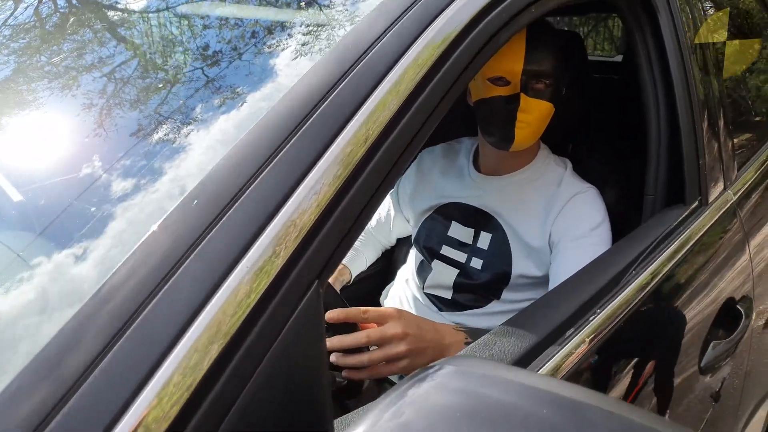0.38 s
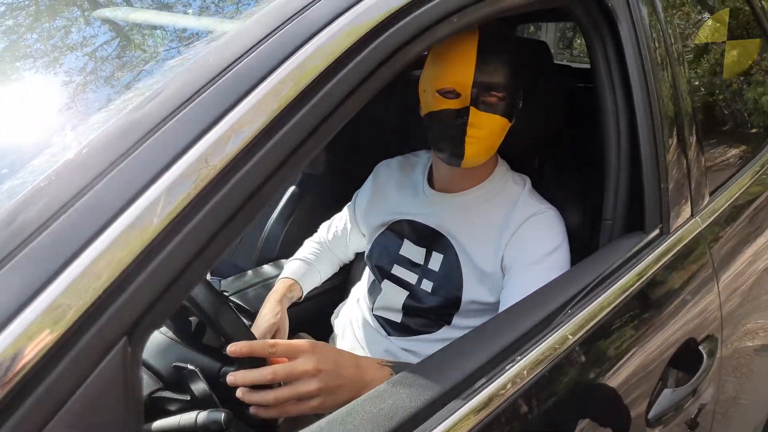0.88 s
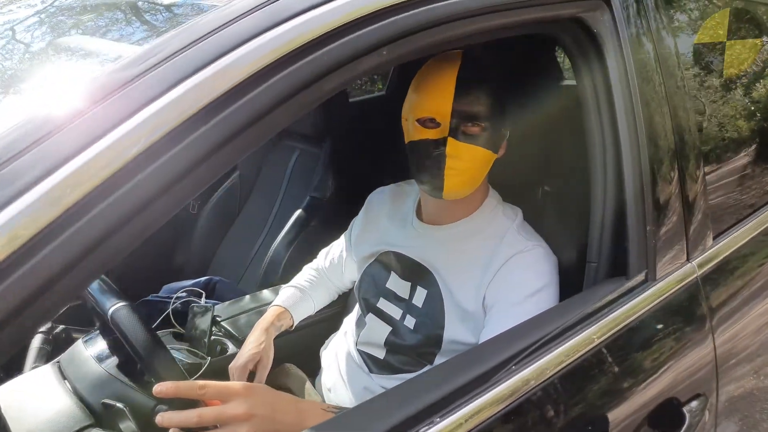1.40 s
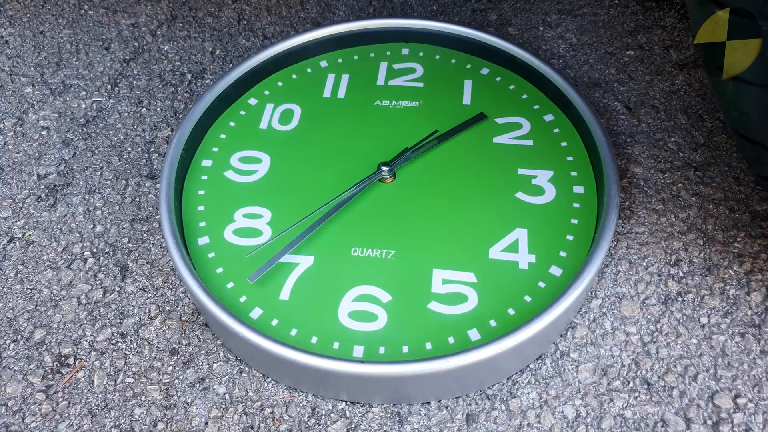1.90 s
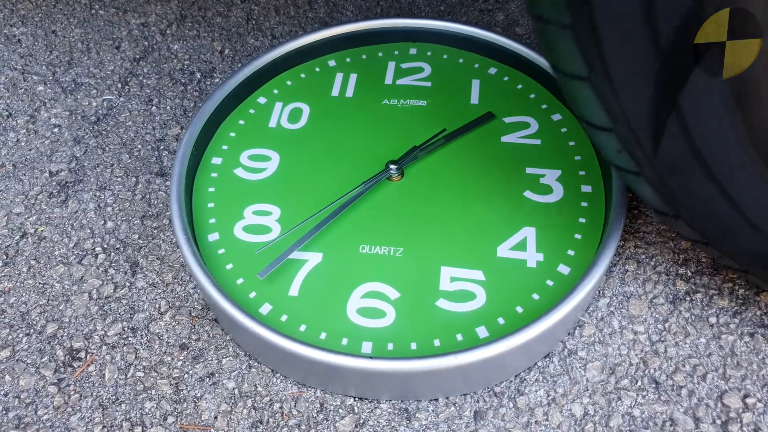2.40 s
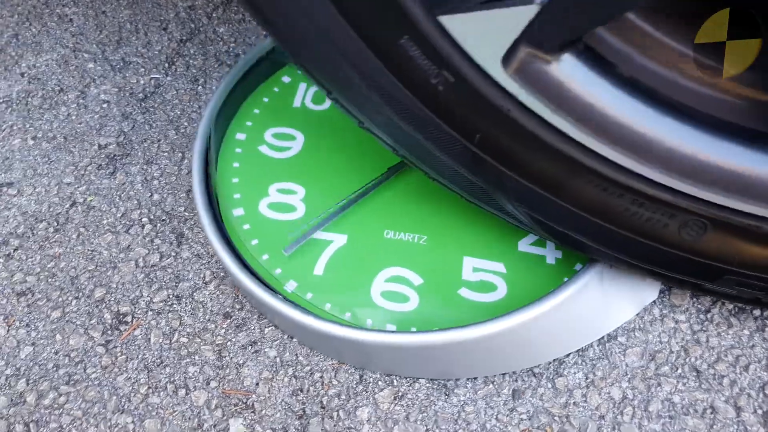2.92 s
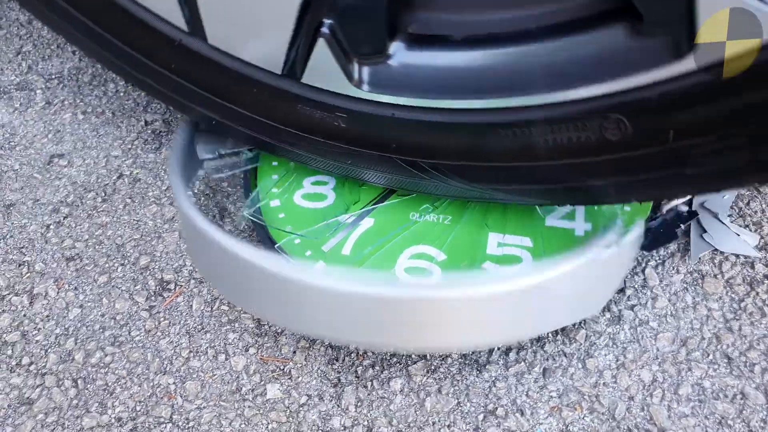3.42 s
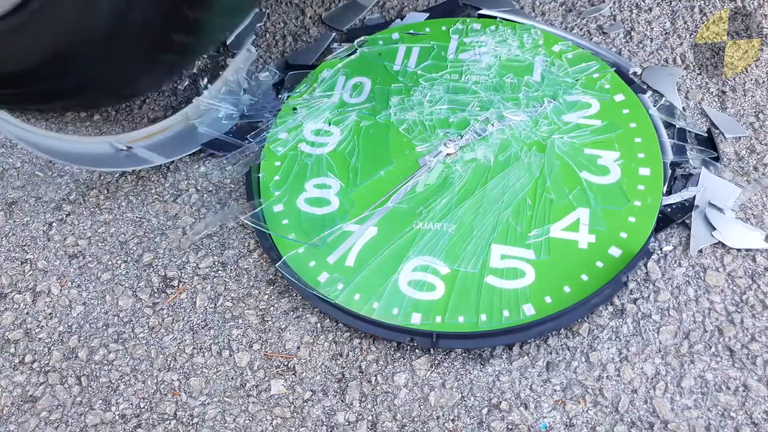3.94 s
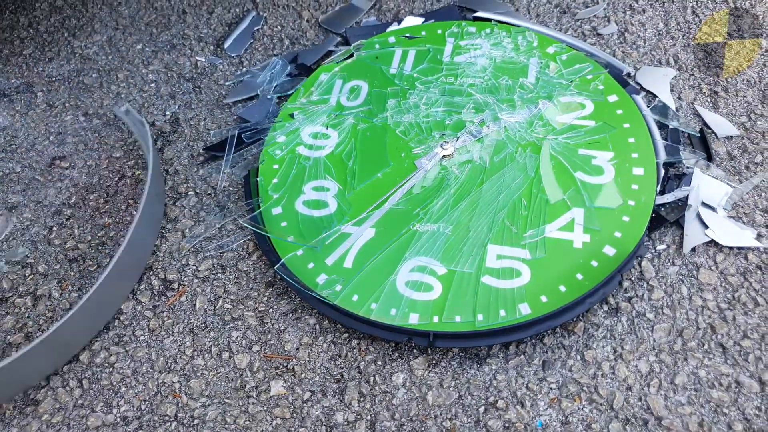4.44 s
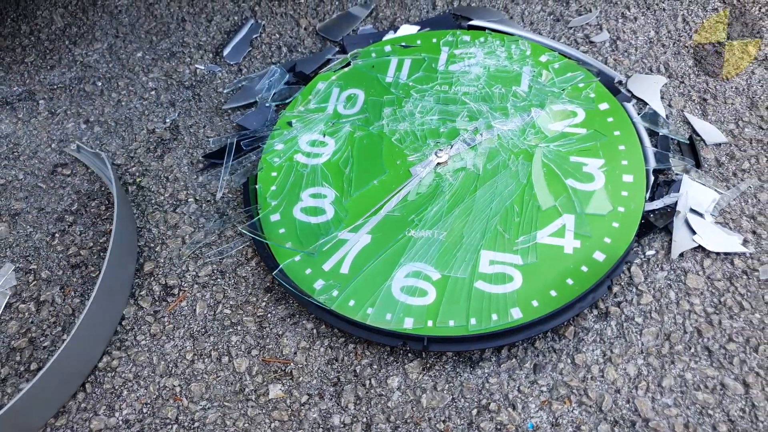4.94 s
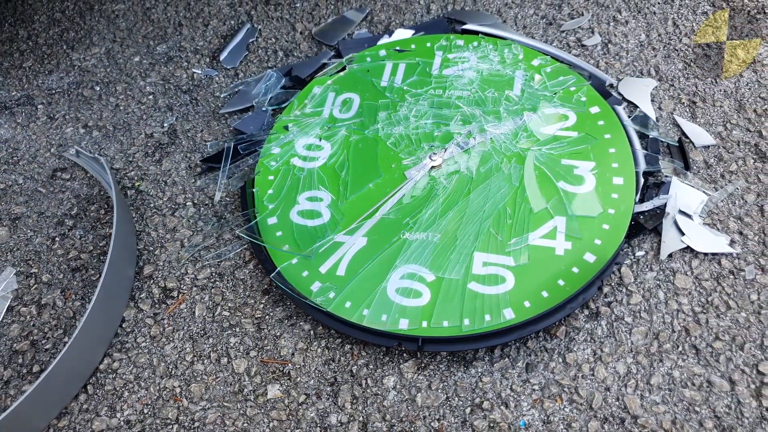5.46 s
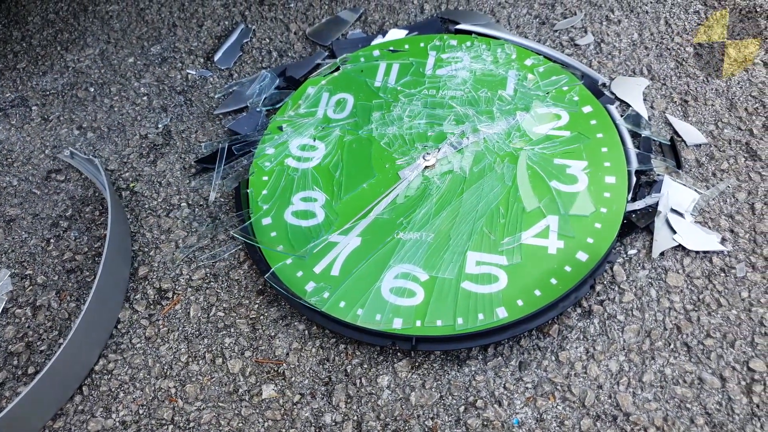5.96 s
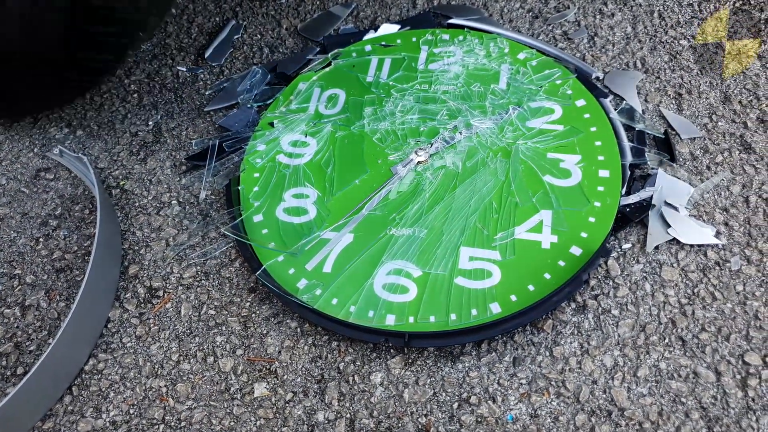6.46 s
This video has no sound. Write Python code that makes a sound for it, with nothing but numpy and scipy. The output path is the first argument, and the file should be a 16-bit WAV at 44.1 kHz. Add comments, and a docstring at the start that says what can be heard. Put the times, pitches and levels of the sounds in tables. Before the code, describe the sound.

Low idling engine hum, a near-silent pause, then a second of loud splintering under a tyre, small settling clicks, and the engine faintly revving back.

```python
"""A tyre climbs a wall clock and cracks its plastic case and glass: noise bursts over a grinding bed.
Fragments chip, shards ring on single notes and a piece of the rim rings as it rocks to rest.
Before this a car idles close by, built from shaft-order tones and pulsing noise; at 1.82 s the listening
point jumps to the asphalt by the clock. At the end the engine comes back louder as the car reverses."""
import sys
import numpy as np
from scipy import signal
from scipy.fft import rfft, irfft, next_fast_len
from scipy.io import wavfile
from scipy.ndimage import uniform_filter1d, map_coordinates

SR = 44100
rng = np.random.default_rng(int(sys.argv[2]) if len(sys.argv) > 2 else 0)


def pcm_store(signal):
    """Save signal as 16-bit PCM."""
    levels = np.round(np.clip(np.atleast_2d(signal), -1, 1) * 32767)
    wavfile.write(sys.argv[1], SR, levels.astype(np.int16).T)


def to_linear_factor(level_db):
    """Convert decibel levels (scalar or array-like) to linear amplitude factors."""
    exponent = np.asarray(level_db, float) / 20
    return 10 ** exponent


N = 290619
TIME = np.arange(N) / SR
CUT_S = 1.82  # jump from beside the car to the ground
BESIDE = TIME < CUT_S
TYRE_OFF_S, RIM_FREE_S = 3.6, 4.385


def unit(x):
    """Scaled to rms 1."""
    return x / np.sqrt(np.mean(x ** 2) + 1e-20)


def along(points, hz):
    """Reads (pitch_hz, value) points on a log frequency axis."""
    f, v = np.transpose(points)
    return np.interp(np.log(hz + 1), np.log(f + 1), v)


def curves(rows):
    """One value per sample for each column after start_s."""
    s, *cols = np.transpose(rows)
    return np.array([np.interp(TIME, s, c) for c in cols])


def wobble(rate):
    """A smooth random curve, rate knots a second."""
    return map_coordinates(rng.standard_normal(int(N * rate / SR) + 4), [TIME * rate])


def filtered(x, response):
    """x shaped by a complex response of frequency."""
    m = next_fast_len(N + 8192)
    return irfft(rfft(x, m) * response(np.fft.rfftfreq(m, 1 / SR)), m)[..., :N]


def rush(spectrum, alike, patchy_db, spiky_db=0.):
    """Coloured stereo noise, its mid at rms 1, with random patches and short random swells."""
    pair = rng.standard_normal((2, N)) * to_linear_factor(spiky_db * wobble(900))
    z = signal.stft(pair, nperseg=256)[2]
    field = rng.standard_normal(z.shape[1:])
    field = uniform_filter1d(uniform_filter1d(field, size=2, axis=0), size=4, axis=1)
    pair = signal.istft(z * to_linear_factor(patchy_db * unit(field)), nperseg=256)[1][:, :N]

    def mid_side(hz):
        # the angle between mid and side sets the left-right likeness
        angle = np.arccos(np.clip(along(alike, hz), -1, 1)) / 2
        return to_linear_factor(along(spectrum, hz)) * [np.cos(angle), np.sin(angle)]

    mid, side = filtered(pair, mid_side)
    return np.array([mid + side, mid - side]) / np.sqrt(np.mean(mid ** 2))


# colours of big, middling and small fragments, and of the tyre's thud: pitch_hz, level_db
KNOCK_COLOUR = [(94, -37.5), (160, -6.5), (303, -7.5), (365, -2.5), (560, -5), (1120, -1.5), (1300, -5.5),
                (1690, -32), (2860, -120)]
CRACK_COLOUR = [(590, -33.5), (1000, -16.5), (1130, -3.5), (1380, -3), (1560, 0), (2040, 1.5), (2450, -3),
                (3130, 1), (3410, -1), (4280, -0.5), (5460, -1.5), (7140, -15.5), (8000, -30), (10400, -42),
                (17600, -120)]
SPLINTER_COLOUR = [(4410, -39), (7500, -7), (11800, 3.5), (14900, -2.5), (16000, -10), (16300, -26.5),
                   (16500, -32)]
THUD_COLOUR = [(20, -28), (75, 4.5), (200, -12), (400, -120)]
# width of the clock's sound: pitch_hz, left-right likeness (-1 to 1)
CLOCK_WIDTH = [(60, 0.84), (150, 0.53), (380, 0.94), (950, 0.61), (2380, 0.031), (5980, 0.53),
               (15000, 0.02)]


def crush():
    """Snaps over a grinding bed: each fracture is a grainy burst in three ranges of fragment size."""
    lurch, bed = grinding()
    blows = bursts()
    level = np.sqrt(bed ** 2 + blows)
    knock = level[0] * rush(KNOCK_COLOUR, CLOCK_WIDTH, patchy_db=4.5, spiky_db=3.5)
    crack = level[1] * rush(CRACK_COLOUR, CLOCK_WIDTH, patchy_db=2.5, spiky_db=2.0)
    splinter = level[2] * rush(SPLINTER_COLOUR, CLOCK_WIDTH, patchy_db=1.5, spiky_db=3.0)
    # crack and splinter lean to the right
    crack = crack * to_linear_factor([[-2.5], [2.5]])
    splinter = splinter * to_linear_factor([[-3.5], [3.5]])
    sharpness = .5 + blows[1] / (level[1] ** 2 + 1e-20)  # fractures drive the rim harder than grinding
    rim = rim_piece((crack + knock) * sharpness)
    thud = lurch * rush(THUD_COLOUR, CLOCK_WIDTH, patchy_db=0.0)
    fragments = to_linear_factor(-7.5) * chips(level[1], count=1100, life_ms=9.6)
    return thud + knock + crack + splinter + rim + fragments


# bulk_db: big pieces knock, small ones splinter
# snaps under the tyre: start_s, level_db, length_ms, bulk_db
SNAPS = [(2.6517, -14, 9.1, 11), (2.7223, -16.5, 8.6, -6.5), (2.735, -17.5, 9.7, -1.5),
         (2.7532, -18.5, 11, -7), (2.7834, -24.5, 3, 0.5), (2.7942, -15, 12, -1.5), (2.806, -19.5, 8.4, 1),
         (2.8164, -16.5, 14, 5.5), (2.8464, -23.5, 5.9, -1.5), (2.8749, -25.5, 12, -0.5),
         (2.884, -6.5, 2.4, 2), (2.9114, -15, 9.2, 6.5), (2.9256, -18, 5.5, 6), (2.9658, -10.5, 3.7, 1),
         (2.975, -13, 7.9, 2), (3.0001, -14.5, 5, -3), (3.0145, -24.5, 8.3, 2), (3.0272, -21.5, 9.6, 2),
         (3.039, -24, 4.7, -1), (3.0458, -19, 11.6, 5.5), (3.0696, -26, 10.8, 1.5), (3.107, -21, 9.7, -4),
         (3.116, -22, 14, -3.5), (3.1403, -14, 8, 2), (3.1789, -11.5, 3.1, 4), (3.192, -15, 10, 4.5),
         (3.2173, -18, 8.7, -3.5), (3.2312, -15, 7.5, 1), (3.257, -15, 3.1, 0), (3.265, -19, 5.5, -0.5),
         (3.2909, -15.5, 8.5, -1.5), (3.3014, -13.5, 9, 1), (3.321, -20, 9.1, -1), (3.3393, -20.5, 4.2, -4),
         (3.366, -16, 8.2, 1), (3.376, -17, 10.6, 2.5), (3.4069, -19, 8.8, -1), (3.4272, -17, 10.7, 0.5),
         (3.4433, -15, 3.4, -1), (3.4492, -21, 8.3, 3), (3.4763, -17.5, 14.4, -2.5), (3.4969, -16, 5, 6.5),
         (3.508, -16.5, 6.8, 0), (3.5436, -15.5, 5.2, -2), (3.579, -23.5, 3, 3.5), (3.62, -23.5, 4.6, -3.5),
         (3.6396, -28, 12.4, 8), (3.656, -39, 5.3, -5)]
# the case creaking under the first load, then pieces settling: start_s, level_db, length_ms, bulk_db
SETTLING = [(2.294, -72, 6.8, -26), (2.335, -74, 60, -14), (2.403, -68, 18, 14), (2.4454, -63, 4.8, 3),
            (2.486, -60.5, 4.3, 5), (2.533, -63, 8, 19), (2.5513, -69, 7.5, 12), (3.7017, -46.5, 7.2, 4),
            (3.732, -48.5, 13, -6), (3.7915, -51.5, 6.2, -25), (3.826, -48.5, 14, -13),
            (3.846, -64, 5.3, -8), (3.888, -49, 9, -7), (3.9057, -46.5, 4, -8), (4.0228, -69.5, 11.8, -13),
            (4.06, -60.5, 7.6, -1), (4.1266, -57, 8.3, 5.5), (4.1418, -60.5, 25, 4),
            (4.1574, -57.5, 8.1, 8), (4.1696, -47, 4.2, -4), (4.1794, -54, 6.2, -4), (4.2047, -49, 3, -11),
            (4.2732, -60, 3.9, -6), (4.3002, -56, 5.8, -5), (4.34, -63, 9.1, -23), (4.3684, -53, 3.7, 4),
            (4.376, -50.5, 10, 5), (4.3897, -57, 19, 6), (4.4154, -51.5, 6.5, -10), (4.498, -55, 5.9, 3),
            (4.514, -60.5, 7.5, 11), (4.5246, -58.5, 4.5, 8), (4.543, -63, 8.2, 8),
            (4.558, -55.5, 6.8, -22), (4.618, -53, 3, 0), (4.6296, -52.5, 10, 6), (4.691, -59.5, 12, 0),
            (4.7262, -56.5, 4.9, 8.5), (4.7427, -58, 2.4, 7), (4.806, -67.5, 2.4, 3)]
# grit popping under the tyres: start_s, level_db, length_ms, bulk_db
PEBBLES = [(.646, -53.5, 8.6, -1), (.668, -51.5, 7.9, -4), (.69, -51, 6.3, -6), (.743, -52, 5.8, -4),
           (1.378, -49.5, 16, 16), (1.435, -40, 7, 6), (1.447, -48, 36, 4), (1.622, -48.5, 2.7, -13),
           (1.668, -54, 4.9, 2)]


def bursts():
    """Power envelopes of knock, crack and splinter: a quick rise, a hold, a fast fade, a faint tail."""
    power, t_ms = np.zeros((3, N + SR)), np.arange(SR // 8) / SR * 1000
    rise = np.clip(t_ms / 1.2, 0, 1) ** 2
    tail = to_linear_factor(-29.5 - 1.3 * t_ms)
    for s, db, ms, bulk_db in np.vstack([PEBBLES, SNAPS, SETTLING]):
        # (level_db re the fracture, stretch of the fade) for knock, crack, splinter
        ranges = [(-12.5 + bulk_db, 1.4), (-1.2, 1.05), (-9 - 0.44 * bulk_db, .9)]
        for band, (level_db, linger) in enumerate(ranges):
            fade = to_linear_factor(-np.clip(t_ms - 0.37 * ms, 0, None) * 26 / (linger * ms))
            burst = rise * (fade + tail) * to_linear_factor(2 * (db + level_db))
            power[band, round(s * SR):][:len(t_ms)] += burst
    return power[:, :N]


# the tyre lurching over the case: start_s, level_db
LURCHES = [(2.67, -35), (2.84, -37), (2.98, -39), (3.17, -41), (3.31, -40.5), (3.39, -40.5), (3.51, -39),
           (3.65, -50.5)]
# steady grinding and skidding of fragments: start_s, level_db
GRIND = [(2.65, -26.5), (3.2, -28), (3.56, -30.5), (3.64, -33), (3.7, -51), (3.81, -64), (4.19, -65),
         (4.24, -77), (4.33, -73), (4.4, -71), (4.53, -67), (4.78, -72.5), (4.85, -105)]
# the grinding lets up for a moment before something gives: start_s (deepest point), depth_db
LULLS = [(2.712, 2.5), (2.77, 10), (2.87, 11), (2.954, 10.5), (2.995, 4.5), (3.021, 5), (3.135, 3.5),
         (3.172, 2.5), (3.25, 3.5), (3.28, 5), (3.355, 1.5), (3.4, 3), (3.465, 7), (3.535, 3), (3.6, 8.5),
         (3.632, 3.5), (3.815, 3), (3.87, 0.5), (4.049, 5), (4.479, 24), (4.605, 1), (4.675, 1)]


def grinding():
    """Gains of the tyre's lurch and of the knock, crack and splinter beds of crushed plastic and glass."""
    rise_db_per_s, fall_db_per_s, lull_s = 200, 130.5, .012
    case_db, flatten_db_per_s, scrape_db = 8, 9.5, -15  # case re lurch, low scrape re grinding
    gate = np.clip((TIME - 2.652) / .004, 0, 1) * (TIME < 4.85)
    lurch = gate * np.max([
        to_linear_factor(db - np.maximum(rise_db_per_s * (s - TIME), fall_db_per_s * (TIME - s)))
        for s, db in LURCHES], axis=0)
    lull_db = sum(db * np.exp(-.5 * ((TIME - s) / lull_s) ** 2) for s, db in LULLS)
    grind = gate * to_linear_factor(curves(GRIND)[0] - lull_db)
    # the hollow case booms with each lurch, less as it flattens
    case = lurch * to_linear_factor(case_db - flatten_db_per_s * (TIME - LURCHES[0][0]))
    low = np.hypot(case, to_linear_factor(scrape_db) * grind)
    # splinters re grinding: under the tyre, flying shards, loose rim
    glass_db = np.select([TIME < TYRE_OFF_S, TIME < RIM_FREE_S], (-8, -4), -20)
    flutter_db = np.where(TIME < TYRE_OFF_S, 2, 3) * wobble(70)
    return lurch, to_linear_factor(flutter_db) * np.array([low, grind, to_linear_factor(glass_db) * grind])


# modes of the loose rim piece: pitch_hz, width_hz, level_db
RIM_MODES = [(1569, 28, 12), (2480, 136, 7), (3265, 55, -2), (4560, 160, -17), (4930, 45, -6)]


def rim_piece(contact):
    """Once free, the rim's curved shell rings in narrow resonances driven by every contact."""
    def shell(f):
        return sum((-1) ** k * to_linear_factor(db) * 1j * f * w / (c * c - f * f + 1j * f * w)
                   for k, (c, w, db) in enumerate(RIM_MODES))

    return to_linear_factor(6.5) * filtered(contact * (TIME > RIM_FREE_S), shell)


# strength of a fragment by its note: pitch_hz, level_db
CHIP_STRENGTH = [(1000, -9), (1800, -1.5), (5200, 3.5), (7500, -10.5), (11500, -3), (14500, -12.5)]


def chips(level, count, life_ms):
    """Small fragments, each struck as hard as the crushing at that moment and ringing on its own note."""
    when, pitch, size, pan = rng.random((count, 4)).T
    at = ((2.9 + 2.1 * when) * SR).astype(int)
    hz, t = 1000 * 14.5 ** pitch, np.arange(SR // 30) / SR
    gain = level[at] * to_linear_factor(along(CHIP_STRENGTH, hz)) * np.minimum(-np.log(1 - size), 2.5)
    where = (at[:, None] + np.arange(len(t))).ravel()
    decay = np.exp(-1000 * t / life_ms)
    sides = []
    # left and right get each piece at their own strength and a quarter cycle apart
    for wave, share in ((np.sin, 1.4 * pan), (np.cos, 1.2 - 0.55 * pan)):
        notes = (gain * share)[:, None] * wave(2 * np.pi * hz[:, None] * t) * decay
        sides.append(np.bincount(where, notes.ravel(), N))
    return np.array(sides)


# single notes that ring, a few clicks before the crush and then shards and plates: start_s, pitch_hz, level_db
# (left channel), length_ms (to 1/e)
RINGS = [(1.439, 1314, -43.5, 14), (1.444, 2950, -36, 20), (2.36, 12200, -69, 45),
         (2.399, 1520, -61.5, 8.6), (2.529, 1790, -55, 11), (2.532, 446, -47.5, 18),
         (2.909, 1540, -25.5, 18), (3.035, 1816, -25, 140), (3.042, 4360, -22.5, 110),
         (3.29, 1245, -15.5, 7.7), (3.445, 13300, -30, 36), (3.566, 11800, -43, 46), (3.66, 5540, -42, 35),
         (3.657, 9670, -38.5, 28), (3.724, 5380, -54, 60), (3.724, 13000, -48, 25),
         (3.785, 11740, -47.5, 31), (3.845, 13200, -55, 20), (3.9, 9900, -53.5, 41), (4.13, 2480, -58, 42),
         (4.155, 3200, -54, 59), (4.19, 4200, -50, 12), (4.269, 2620, -58.5, 40), (4.33, 8080, -60, 67),
         (4.408, 8630, -58, 27)]


def shards():
    """Thin pieces, and a few clicks before the crush, ring on one slightly unsteady note, stronger on the
    right."""
    out = np.zeros((2, N + SR))
    shiver, unsteady_rad = (wobble(260), wobble(260)), 1.5
    t = np.arange(SR // 5) / SR
    for s, hz, db, ms in RINGS:
        at = round(s * SR)
        shape = np.clip(t / 0.0015, 0, 1) * np.exp(-(1000 * t / ms) ** 2)
        for side in range(2):
            phase = 2 * np.pi * hz * t + unsteady_rad * shiver[side][at:at + len(t)]
            out[side, at:at + len(t)] += to_linear_factor(db + 3.1 * side) * shape * np.sin(phase)
    return out[:, :N]


# balance of the car's noise: pitch_hz, left minus right (dB)
CAR_LEAN = [(60, 1), (150, 0.0), (380, 1.5), (950, 0.5), (2380, -7), (5980, 0), (15000, -4)]


def engine():
    """The car: shaft-order tones and body hums in the middle, pulsing noise and rolling tyres around."""
    hz, throb_db, near_db = engine_speed()
    turn = 2 * np.pi * np.cumsum(hz) / SR
    roll = roll_level()
    noise = engine_noise(turn, near_db, roll) + tyre_grit(roll)
    lean = filtered(noise, lambda f: to_linear_factor(along(CAR_LEAN, f) * [[.5], [-.5]]))
    return np.sqrt(2) * (order_tones(hz, turn, throb_db) + body_hums()) + lean


IDLE_HZ = 27.46  # half-order at idle
# engine heard from the ground: start_s, half_order_hz, exhaust throb_db, nearness_db
GROUND = [(1.83, 27.3, -72, -72), (2.05, 27.5, -65.5, -70), (2.25, 27.3, -66.5, -71.5),
          (2.45, 26.8, -64, -68), (3.8, 27.3, -69, -80), (4.4, 27.3, -69, -79), (4.78, 27.3, -66, -74),
          (5.0, 27.9, -59, -71.5), (5.12, 28.1, -58.5, -67.5), (5.2, 29, -67.5, -65.5),
          (5.35, 28.6, -59.5, -65), (5.45, 31.4, -63, -63), (5.6, 34.2, -60, -61.5), (5.8, 37.5, -62, -58),
          (5.95, 35.1, -57.5, -58), (6.05, 35.5, -54, -55), (6.15, 36.2, -56, -57.5), (6.2, 33.8, -58, -58),
          (6.27, 26.8, -63, -55.5), (6.35, 27.8, -49.5, -56.5), (6.45, 28.1, -48, -57),
          (6.59, 27.6, -48, -56)]


def engine_speed():
    """Half-order rate, throb and nearness: a steady idle beside the car, a moving one from the ground."""
    hz, throb_db, near_db = curves(GROUND)
    return np.where(BESIDE, IDLE_HZ, hz), throb_db, near_db


# multiples 1-5 of the half-order: beside_start_db, beside_cut_db (rms),
# then on the ground, re the throb: idle_db, revving_db
MULTIPLES = [(-63, -80, -24.5, -6), (-40, -42, -11.5, 3), (-53, -45, -0.5, 1.5), (-61, -61, -19.5, -3.5),
             (-61.5, -60.5, -17, -9)]


def order_tones(hz, turn, throb_db):
    """Firing and shaft orders as sines; from the ground an exhaust-pipe resonance lifts them in passing."""
    rev_span_hz = 6.6  # rise that counts as full throttle
    pipe_hz, pipe_width_hz, pipe_db = 147, 3.8, 9.5
    rev = np.clip((hz - IDLE_HZ) / rev_span_hz, 0, 1)
    tones = 0
    for k, (start_db, cut_db, idle_db, full_db) in enumerate(MULTIPLES):
        beside_db = start_db + (cut_db - start_db) * TIME / CUT_S
        pipe = pipe_db * np.exp(-.5 * (((k + 1) * hz - pipe_hz) / pipe_width_hz) ** 2)
        ground_db = throb_db + idle_db + (full_db - idle_db) * rev + pipe
        level_db = np.where(BESIDE, beside_db, ground_db) + 0.46 * wobble(6)
        tones = tones + to_linear_factor(level_db) * np.sin((k + 1) * turn + 0.88 * k * k)
    return tones


# hums of the car body at idle: pitch_hz, start_db, cut_db (rms)
HUMS = [(277, -60, -62.5), (357.4, -54.5, -58), (489, -70, -60.5), (565, -51, -66.5), (658, -65, -58.5)]


def body_hums():
    """Body panels hum on fixed, slightly wavering notes, heard beside the car only."""
    hums = 0
    for hz, start_db, cut_db in HUMS:
        level_db = start_db + (cut_db - start_db) * TIME / CUT_S + 2.3 * wobble(5.14)
        hums = hums + to_linear_factor(level_db) * np.sin(2 * np.pi * hz * TIME + 0.097 * wobble(19.0))
    return hums * BESIDE


# colours of drone and clatter, beside the car and from the ground: pitch_hz, level_db
DRONE_BESIDE = [(15, -27), (25, -8), (65, 0), (82, -8), (130, -10), (273, -6), (314, -11), (372, -3),
                (448, -10.5), (574, -5.5), (669, -7.5), (793, -12), (1000, -43), (1300, -58), (2200, -120)]
DRONE_GROUND = [(20, -42), (45, -12.5), (100, -8), (207, -5), (314, -19.5), (409, -5.5), (565, -9.5),
                (690, -14.5), (1000, -22), (1300, -50), (2200, -120)]
CLATTER_BESIDE = [(470, -46), (800, -4), (1080, 0.5), (1380, -9), (1490, -4), (1970, -1.5), (2140, -7.5),
                  (3500, -12), (4050, -16), (5500, -42), (7150, -24), (12100, -120)]
CLATTER_GROUND = [(470, -33.5), (800, 2), (904, -3.5), (1290, -2.5), (1480, -7), (2000, -3.5), (3170, -9.5),
                  (3480, -5.5), (5060, -13), (7500, -33), (9750, -58.5), (16500, -120)]
# colours of the treble hiss and of the valve tick: pitch_hz, level_db
HISS_COLOUR = [(2650, -29), (4500, -1), (6200, 0.5), (6990, -4), (7880, -11.5), (9170, -5.5),
               (13900, -13.5), (16100, -28), (16500, -47)]
TAPPET_COLOUR = [(2400, -43), (3400, -1), (4100, -37)]
# width of the car's noise: pitch_hz, left-right likeness (-1 to 1)
CAR_WIDTH = [(60, 0.72), (150, 0.93), (380, 0.75), (950, -0.3), (2380, 0.13), (5980, -0.16), (15000, 0.37)]


def engine_noise(turn, near_db, roll):
    """Drone, valve clatter and hiss swell once per half-order cycle; rolling tyres add to the hiss."""
    tick_at = .7  # place of the valve tick in the cycle (turns)
    drone_db = np.where(BESIDE, -45.5 - 1.7 * TIME, near_db)
    clatter_db = np.where(BESIDE, -53, near_db - 7)
    # from the ground the hiss follows the nearness by 0.45 dB per dB
    hiss_db = np.where(BESIDE, -70, -81 + .45 * (near_db + 57))
    hiss = np.hypot(to_linear_factor(hiss_db), to_linear_factor(-8.5) * roll)
    drone = np.where(BESIDE, rush(DRONE_BESIDE, CAR_WIDTH, patchy_db=1.0),
                     rush(DRONE_GROUND, CAR_WIDTH, patchy_db=-1.0))
    clatter = np.where(BESIDE, rush(CLATTER_BESIDE, CAR_WIDTH, patchy_db=1.0, spiky_db=2.0),
                       rush(CLATTER_GROUND, CAR_WIDTH, patchy_db=1.0, spiky_db=2.0))
    # each cycle starts with a quick swell that dies away until the next; shallower from the ground
    swell = .5 - (turn / (2 * np.pi) - tick_at + 0.061) % 1
    swell = unit(uniform_filter1d(swell, size=300)) * np.where(BESIDE, 1, .45)
    noise = to_linear_factor(drone_db + .3 * swell) * drone
    noise += to_linear_factor(clatter_db + 1.1 * wobble(15) + 2.8 * swell) * clatter
    noise += hiss * to_linear_factor(0.92 * wobble(8.2) + .8 * swell) * rush(HISS_COLOUR, CAR_WIDTH, patchy_db=-1.1)
    # a short bright tick near the start of each cycle, stronger every second turn
    tick = np.exp(7 * (np.cos(turn - 2 * np.pi * tick_at) - 1))
    tick = tick * (1 - 0.38 * np.cos(turn / 2 - np.pi * tick_at))
    noise += to_linear_factor(clatter_db - 4.5) * tick * BESIDE * rush(TAPPET_COLOUR, CAR_WIDTH, patchy_db=2.1)
    return noise


# tyres starting to roll on grit: start_s, level_db
ROLL = [(0, -60), (1.0, -59.5), (1.35, -58.5), (1.55, -54), (1.65, -49), (1.75, -45), (1.82, -46.5)]


def roll_level():
    """Gain of the rolling tyres, heard beside the car only."""
    return to_linear_factor(curves(ROLL)[0]) * BESIDE


# colour of tyres on grit: pitch_hz, level_db
GRIT_COLOUR = [(710, -6), (1200, 0), (1380, -6), (1710, 5), (1830, 1), (3030, 5), (4220, -6.5), (6500, -37),
               (8450, -55), (14300, -120)]


def tyre_grit(roll):
    """Tyres crunch on grit: patchy, grainy noise that flutters with the rolling."""
    return roll * to_linear_factor(1.1 * wobble(40)) * rush(GRIT_COLOUR, CAR_WIDTH, patchy_db=2.2, spiky_db=2.2)


def scene():
    """Crushing, ringing shards and engine."""
    return crush() + shards() + engine()


def low_pass(x):
    """Removes everything above the highest recorded frequency."""
    return signal.sosfilt(signal.butter(12, 16850, fs=SR, output="sos"), x)


def record(dry):
    """Loud peaks round off near full scale."""
    mix = dry / (1 + np.abs(dry) ** 6) ** (1 / 6)
    return low_pass(mix)


dry = scene()
out = record(dry)
pcm_store(out)
```